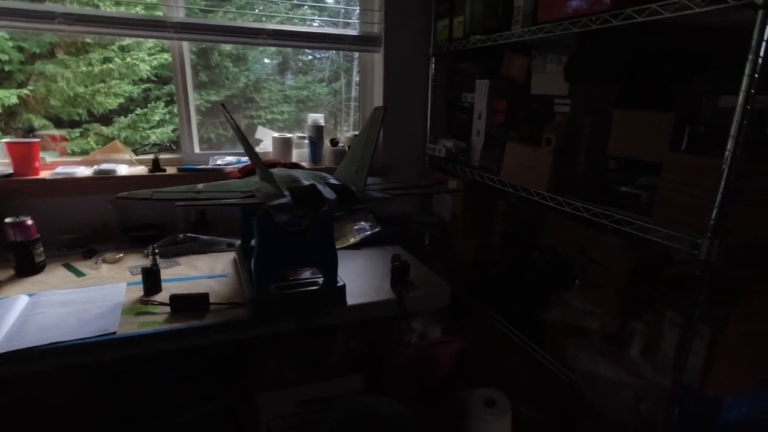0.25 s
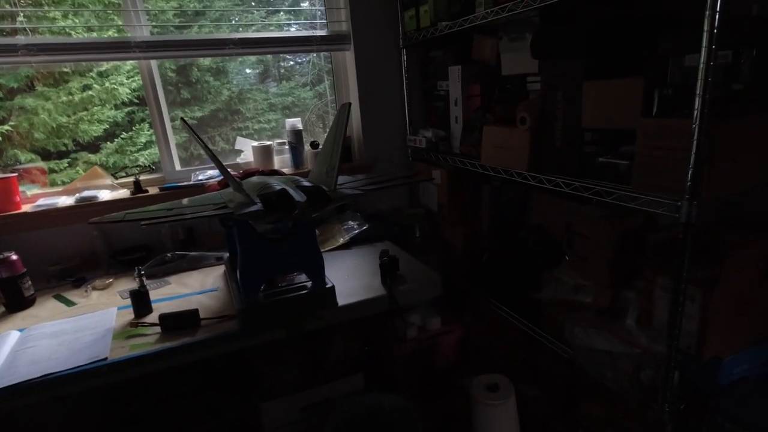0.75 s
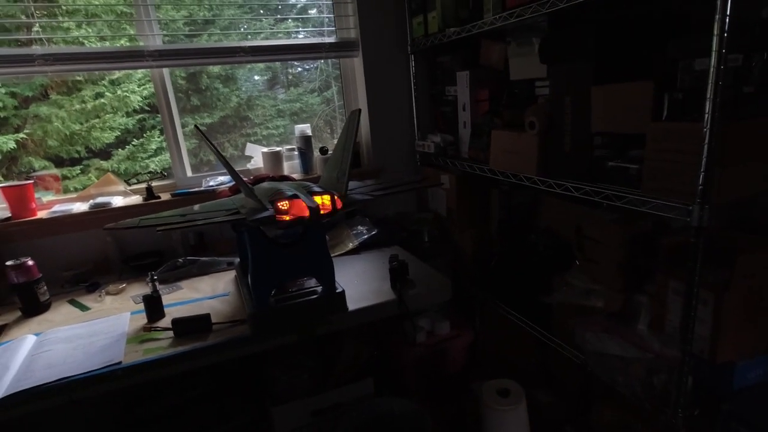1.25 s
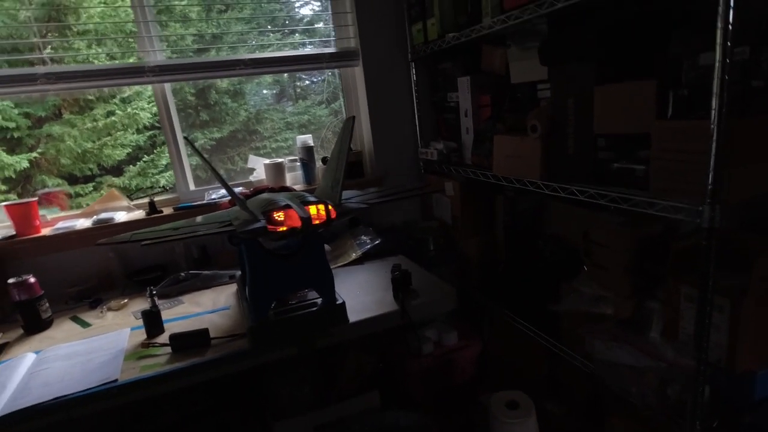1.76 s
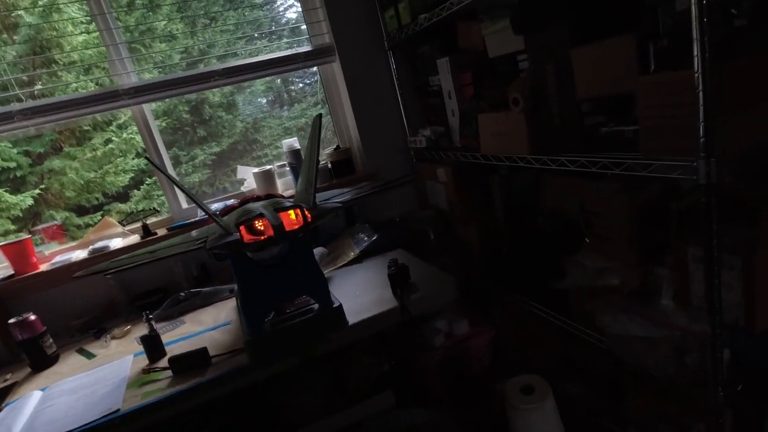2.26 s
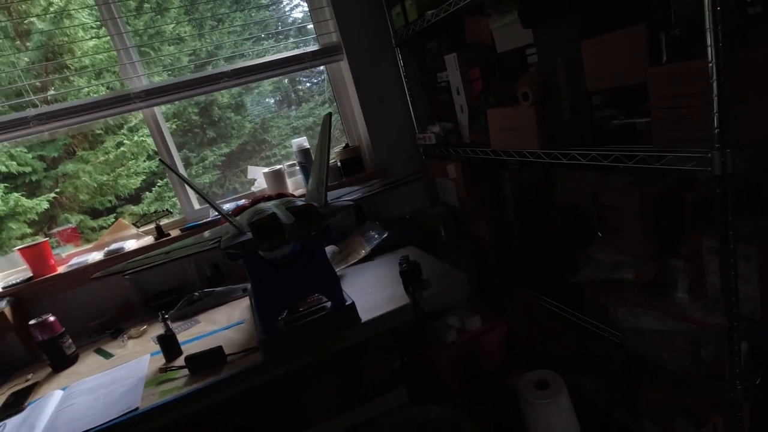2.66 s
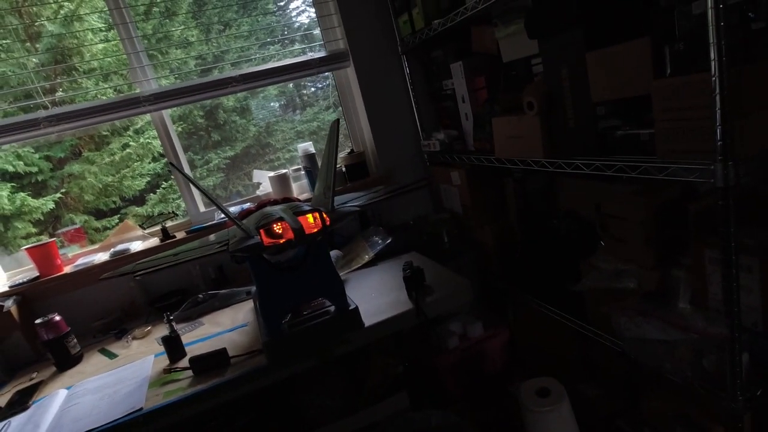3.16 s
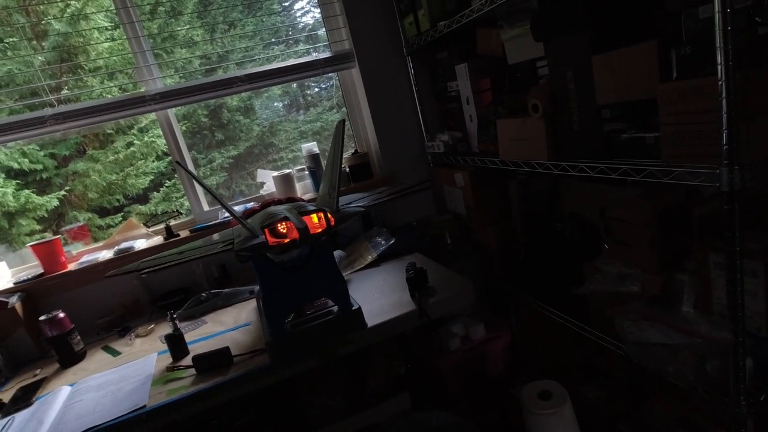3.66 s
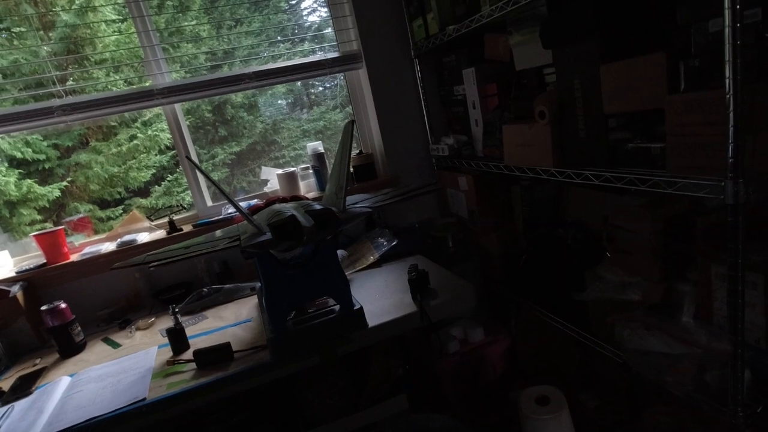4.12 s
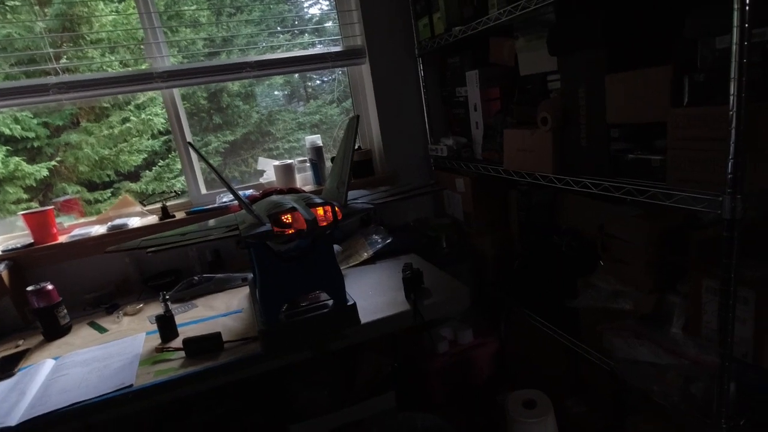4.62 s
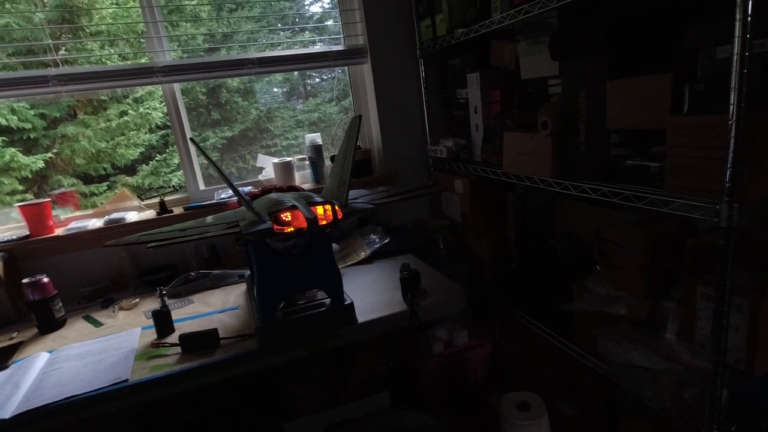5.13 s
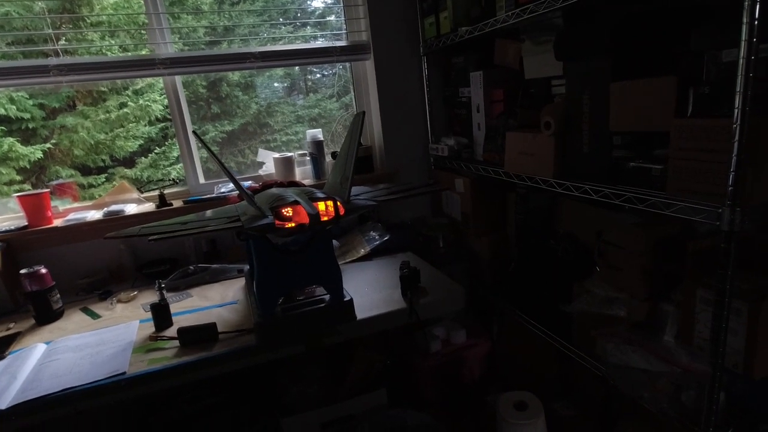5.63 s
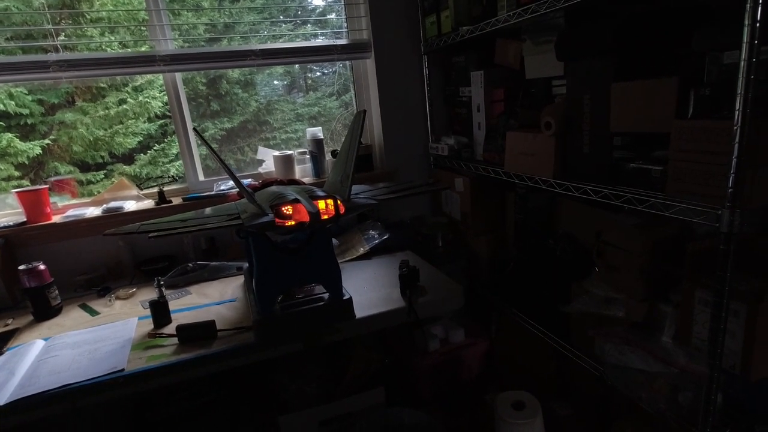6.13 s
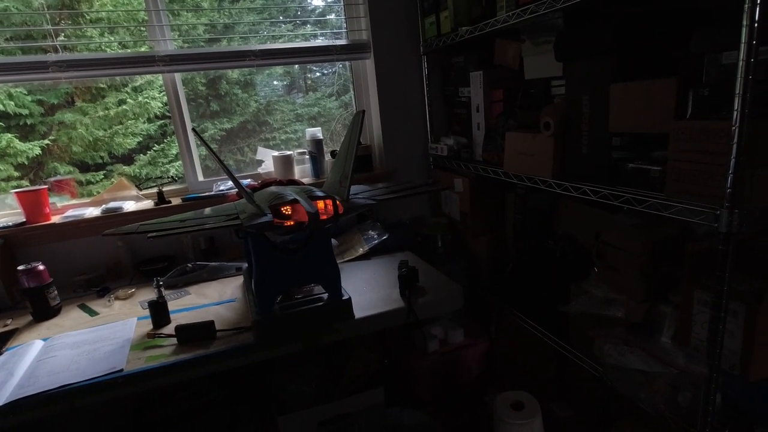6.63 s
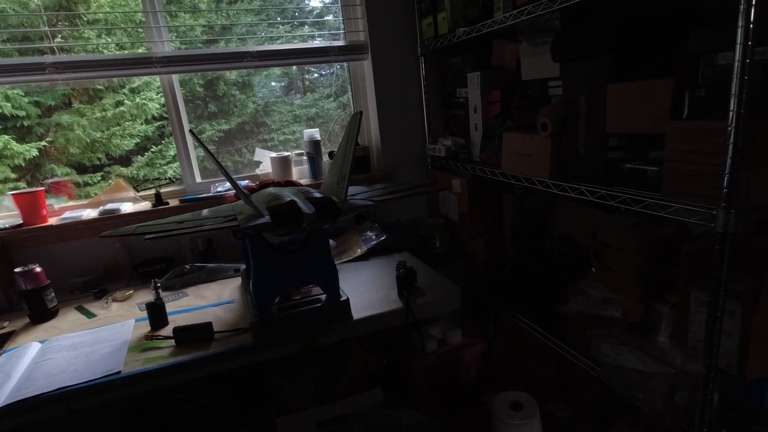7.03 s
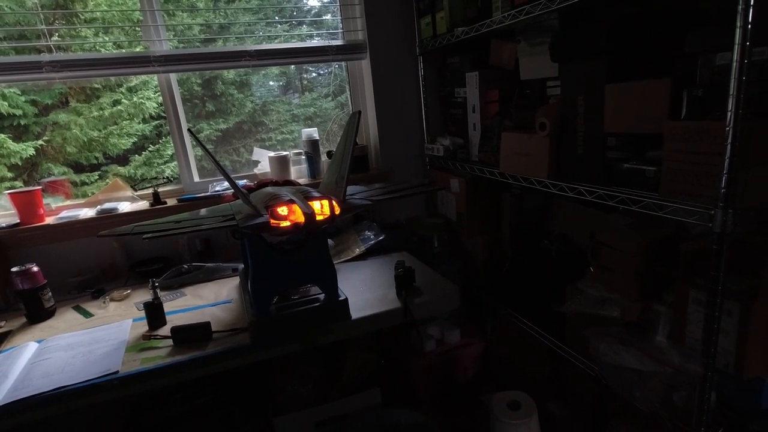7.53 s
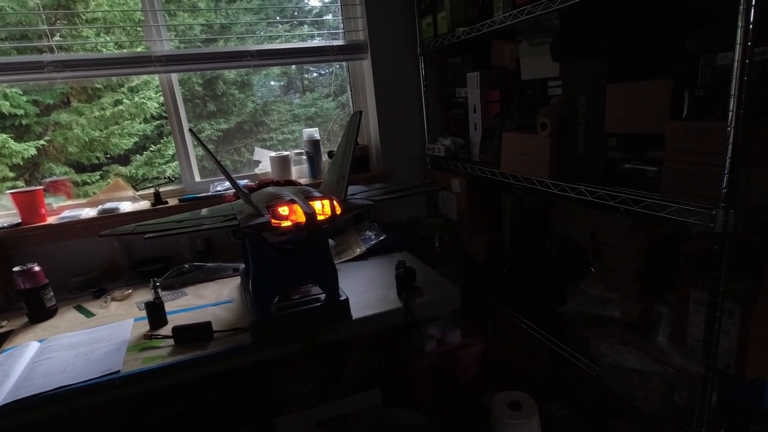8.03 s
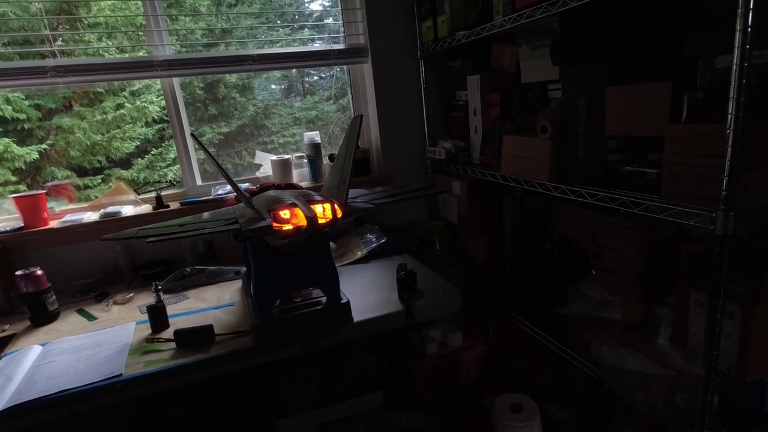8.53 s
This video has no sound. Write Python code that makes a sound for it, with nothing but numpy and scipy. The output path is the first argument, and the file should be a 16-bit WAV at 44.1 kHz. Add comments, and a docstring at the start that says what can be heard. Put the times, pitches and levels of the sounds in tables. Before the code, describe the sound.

Indoors, close behind a model jet's exhaust: quiet fan hiss and a piercing blade whine glide quickly upward, with a higher motor-coil squeal above. Fluttering puffs lick the microphone, growing into loud, low, uneven buffeting in both ears. Irregular hard gusts punch through with momentary ducking and rounded distortion. Fan roar and hiss grow brighter towards the end, still running at high speed.

```python
"""Model jet fan spooling up

A small electric ducted fan on a bench speeds up in steps, heard at two microphone ports in its exhaust.
Behind, the duct hums, roars and hisses (shaped noise), the blades whine and the motor coils sing (sine tones).
In front, the jet of air buffets the ports (noise played at a changing speed) and sharp gusts hit them
(short noise bursts). A limiter turns everything down for a moment under the strongest peaks."""
import sys
import numpy as np
from scipy import signal
from scipy.fft import rfft, irfft, next_fast_len
from scipy.io import wavfile
from scipy.ndimage import uniform_filter1d, minimum_filter1d, map_coordinates

SR = 44100
rng = np.random.default_rng(int(sys.argv[2]) if len(sys.argv) > 2 else 0)


def output_pcm(signal):
    """Save a mono or channel-first signal as 16-bit PCM at the path in sys.argv[1].

    Samples are clipped to [-1, 1] before scaling.
    """
    pcm = np.clip(np.atleast_2d(signal).T, -1, 1) * 32767
    wavfile.write(sys.argv[1], SR, np.round(pcm).astype(np.int16))


N = 387198

# All table levels are relative: the functions below add further gains.
# Air noise of the duct over time: (t/s, roar level/dB, hiss level/dB)
DUCT_LEVELS = [(0, -50, -54.5), (2.3, -51.5, -57.5), (3.2, -49.5, -55), (4.0, -49.5, -54.5),
               (4.9, -48, -52), (6.1, -46, -50), (7.5, -45, -47.5), (8.78, -45.5, -49.5)]
# Spectra of roar and hiss: (f/Hz, level per Hz/dB)
ROAR_SPECTRUM = [(300, -48), (900, -7), (1550, -3), (2300, 2.5), (3300, -1.5), (4300, -4.5), (5300, -8.5),
                 (7000, -32), (9000, -64)]
HISS_SPECTRUM = [(2650, -44), (4500, -30), (5370, -7.5), (6380, -4.5), (6970, -12.5), (7900, -8.5),
                 (8630, -12.5), (12800, 1.5), (14500, -0.5), (15600, -4)]
# Tail pipe resonances: (f/Hz, width/Hz, strength against the plain roar/dB)
PIPE_MODES = [(1590, 34, -9), (2300, 11, -20), (3150, 39, -7)]
# Hum of the airframe: (f/Hz, level per Hz/dB), then (t/s, level/dB)
HUM_SPECTRUM = [(100, -26), (250, -4.5), (500, -6), (1000, -5.5), (1300, -5.5), (1700, -15), (3000, -41)]
HUM_LEVELS = [(0, -44), (.5, -46.5), (1, -47), (2, -45.5), (8.78, -37.5)]
# Fuselage resonances: (f/Hz, width/Hz, strength against the plain hum/dB)
BODY_MODES = [(399.6, 20, 18.5), (589, 21, 12.5), (922, 49, 4)]
# Throaty whirr that dies away: (f/Hz, level per Hz/dB), then (t/s, level/dB)
WHIRR_SPECTRUM = [(1500, -40), (2200, -23), (2720, 1.5), (3100, -2.5), (3550, -3.5), (4200, -3),
                  (5500, -26)]
WHIRR_LEVELS = [(0, -43.5), (.33, -40), (.4, -52), (.5, -39), (.62, -47), (1, -48), (8.78, -82)]
# Throttle steps: (t/s, blade rate the rotor heads for, f/Hz)
THROTTLE_STEPS = [(0.0, 3430), (0.13, 3817), (0.311, 4050), (0.623, 4463), (2.235, 4755), (2.898, 4902),
                  (3.306, 5058), (3.836, 5208), (4.239, 5300), (4.407, 5428), (4.837, 5541), (5.079, 5603),
                  (5.408, 5741), (5.749, 5880), (6.28, 6104), (6.632, 6166), (6.922, 6252), (7.37, 6452),
                  (7.577, 6405)]
# Clear tones (blade, its octave, upper coil tone): (multiple of switching rate, multiple of blade rate)
CLEAR_TONES = [(0, 1), (0, 2), (1, 1)]
# How loud each clear tone is at each pitch, one list per tone: (f/Hz, level/dB)
TONE_PATHS = [
    [(3430, -48), (3700, -34.5), (3880, -45), (4000, -40.5), (4150, -43), (4460, -47.5), (5400, -47),
     (6420, -50)],
    [(6860, -68), (9000, -65), (9700, -65), (10100, -58.5), (11400, -52), (12850, -45)],
    [(11450, -56), (12000, -61), (12480, -46.5), (12800, -38.5), (13100, -54), (13500, -62), (14450, -64)],
]
# Brief swells and fades, one list per clear tone: (t/s, half length/s, level change/dB)
TONE_SWELLS = [
    [(.63, 0.021, 5.5), (.93, 0.046, -3), (1.05, .057, 1.5), (1.67, 0.069, 10), (1.88, 0.048, 6),
     (2.13, 0.1, -20), (2.95, .03, 10), (3.04, 0.036, -2), (3.31, 0.11, -10), (3.45, 0.029, 6),
     (3.95, .05, -7), (4.1, 0.041, 2), (4.36, 0.047, 0), (4.53, 0.031, 1), (4.64, .038, -6),
     (4.81, .055, -6), (4.93, 0.037, 3), (5.34, 0.05, 6), (5.47, 0.034, -13), (6.27, 0.19, 8.5),
     (6.37, 0.058, -6), (7.69, 0.2, 5.5), (8.52, 0.26, -19)],
    [(3.39, 0.042, -8), (3.53, .034, -7), (3.65, 0.052, 9), (4.32, 0.041, 10), (4.5, .05, -4),
     (5.39, 0.13, 4), (6.55, 0.059, 6), (7.07, 0.05, 11), (7.11, 0.33, -7), (8.17, 0.12, -4)],
    [(1.0, 0.061, 2), (1.3, 0.1, -10), (1.78, 0.041, -1.5), (2.46, 0.093, 5), (2.87, .03, -14),
     (2.97, 0.039, 6.5), (3.15, 0.33, 2.5), (3.85, .098, -11), (3.93, 0.13, 15), (4.36, 0.055, 9),
     (4.69, 0.072, -14)],
]
# Passing faint tones: (multiple of switching rate, multiple of blade rate, start t/s, end t/s, level/dB)
FAINT_TONES = [(0, 3, 0, .14, -60), (0, 3, 2.3, 3.3, -64), (0, 3, 3.45, 4.1, -59), (0, 2.5, 3.55, 4.1, -50),
               (1, .5, 1.5, 2.3, -64), (1, .5, 2.35, 2.95, -56), (2, -.5, 6, 6.35, -49),
               (1, 0, .1, 2.1, -69)]
# Brief dips of all the fan noise and tones: (t/s, depth/dB)
FAN_DIPS = [(2.35, 3), (3.08, -1), (3.26, 2), (3.81, 0), (3.94, 3), (4.25, 2), (4.43, 3), (4.64, 0),
            (5.06, 2), (5.65, 3), (5.99, 3.5), (6.37, 5), (6.77, 3), (7.14, 5), (7.36, 2), (7.53, 1),
            (7.73, 6), (7.85, 3.5), (8.21, 3), (8.44, 3)]
# Steady part of the exhaust stream on the ports: (t/s, level/dB, sharpness/dB)
STREAM_LEVELS = [(0, -70, -14), (.23, -61, -14), (.26, -33.5, -13), (.47, -31.5, -15), (.54, -53, -14),
                 (.65, -41, -16), (1.3, -29.5, -15), (1.37, -52, -14), (1.5, -42, -15), (1.68, -38, -15),
                 (1.76, -16, -16), (1.9, -16.5, -13), (2.15, -16.5, -18), (2.75, -11.5, -17.5),
                 (3.2, -13.5, -16), (3.75, -14.5, -12.5), (4.25, -14.5, -13), (4.7, -14.5, -14),
                 (5.2, -16.5, -14.5), (5.7, -14.5, -16), (6.2, -15, -16), (6.8, -13.5, -13.5),
                 (7.35, -15, -15), (7.6, -15, -16), (8.0, -15, -15.5), (8.4, -16.5, -15), (8.78, -18, -15)]
# Early moments when the stream licks the ports: (start t/s, length/s, level/dB, sharpness/dB)
STREAM_SURGES = [(0.348, 0.061, -22, -14), (0.595, 0.059, -19.5, -29), (0.686, 0.062, -23, -27),
                 (0.75, 0.077, -24.5, -16), (0.858, 0.059, -12, -22), (0.936, 0.065, -24, -11),
                 (1.037, 0.044, -22.5, -31), (1.139, 0.042, -23.5, -17), (1.183, 0.051, -21.5, -22),
                 (1.24, 0.08, -22.5, -14), (1.396, 0.079, -23, -11), (1.505, 0.043, -27, -18),
                 (1.552, 0.089, -22.5, -10), (1.641, 0.031, -25, -9), (1.687, 0.069, -16.5, -20)]
# Moments when the stream swings away: (t/s, depth/dB)
STREAM_LULLS = [(2.05, 5.5), (2.59, 15.5), (3.59, 10), (4.67, 6), (4.84, 9), (5.36, 8), (5.571, 11),
                (5.82, 0), (5.93, 9), (6.04, 4), (6.21, 9), (6.43, 4.5), (6.63, 10), (7.48, 4), (7.70, 8),
                (7.80, 12), (8.46, 10), (8.66, 1)]
# Eddies at middle speed, and slow pressure heaves: (f/Hz, level per Hz/dB)
EDDY_SPECTRUM = [(12, -0.5), (22, -10.5), (45, -1), (150, -1), (300, -9.5), (600, -20), (1200, -31.5),
                 (2500, -49.5), (6000, -80)]
HEAVE_SPECTRUM = [(12, -23), (22, -2), (45, -11), (90, -7), (160, -32), (400, -90)]
# Single sharp gusts: (t/s, peak level/dB, edge against peak/dB, left over right/dB)
GUST_HITS = [(0.955, -10, -47, -1), (1.417, -10.5, -24, -1.5), (1.569, -21, -38, 13), (2.153, -14, -35, 9),
             (2.288, -16, -12.5, -2), (2.618, -16, -29, -5), (2.881, -20, -32, 1), (2.941, -11, -10, 3),
             (3.002, -5, -15, -1), (3.133, -16, -13, 2), (3.383, -3, -22, -3), (3.814, 8.5, -11.5, 1.5),
             (3.937, -14, -19, -3), (4.019, -4, -9.5, -3), (4.134, -14, -11, 6), (4.166, -3, -18, -4),
             (4.287, -18, -2, 4), (4.31, -3.5, -21, 0), (4.364, -12, -21, -8), (4.422, -5, -22, 0),
             (4.486, -12, -24, 0.5), (4.629, -1.5, -14, 1), (4.708, -11, -27, -7), (4.882, -14, -30.5, 6),
             (5.009, -6, -14, 2.5), (5.176, -8, -11.5, -2), (5.256, -8, -14.5, 1), (5.513, -8.5, -8.5, 2),
             (5.563, -6.5, -11.5, 3.5), (5.645, -7.5, -6, -1), (5.768, -1.5, -19, -2.5),
             (5.886, -11.5, -30, -7), (6.137, -14, -34, -2), (6.35, -13.5, -6, -3), (6.488, -4.5, -22, 1),
             (6.594, -4, -7.5, -6), (6.638, -6.5, -31, 4), (6.891, -2, -6.5, 3), (7.281, -3.5, -10, -1),
             (7.441, -17, -27, 18), (7.723, -10, -14, -1), (7.882, -3.5, -9, 0), (8.174, -6.5, -12.5, 2),
             (8.251, -17, -12, -1), (8.317, -16, 3, 1), (8.438, -10, -11.5, -2), (8.673, -10.5, -8, 2)]
# Body and ragged edge of a gust: (f/Hz, level per Hz/dB)
PUFF_SPECTRUM = [(60, 18.5), (200, -2.5), (500, 1), (1000, -11), (1600, -40), (3000, -136), (6000, -90)]
EDGE_SPECTRUM = [(600, 8), (1300, 8), (1800, 1.5), (2600, -8), (4000, -17), (7000, -35)]

SWITCH_HZ, ROTOR_LAG_S = 8021, .0674  # motor drive switching rate; rotor response time
TONE_FADE_DB, DIP_S = 2, 0.018
LULL_S, SWAY_DB, SHARP_SWAY_DB = 0.016, 0.63, 1.7845
QUICKEN_DB, QUICKEN_S = 4, .025  # each gust also sharpens the stream around it
TOP_HZ = 15784  # nothing passes above this
STEP = 64  # slow curves are worked out on every 64th sample
COARSE = np.arange(0, N + STEP, STEP)


def amp(db):
    """Turn dB into an amplitude factor."""
    return 10 ** (np.asarray(db) / 20)


def unit(x):
    """Scale to an rms of 1."""
    return x / np.sqrt(np.mean(x ** 2) + 1e-20)


def curves(rows):
    """One value per sample for each column after the time."""
    s, *columns = np.transpose(rows)
    return [np.interp(np.arange(N) / SR, s, column) for column in columns]


def fine(x):
    """Go from every 64th sample to all of them."""
    return np.interp(np.arange(N), STEP * np.arange(len(x)), x)


def bumps(centres, widths):
    """One smooth bell in time for each centre, on the coarse grid."""
    return np.exp(-((COARSE / SR - np.c_[centres]) / np.c_[widths]) ** 2)


def wobble(knots_per_s):
    """A smooth random curve through random knots."""
    knots = rng.standard_normal(N // 300)
    return fine(map_coordinates(knots, [COARSE * knots_per_s / SR]))


def filtered(x, response):
    """Shape x by a gain that depends on frequency."""
    n = x.shape[-1]
    m = next_fast_len(n + 8192)
    return irfft(rfft(x, m) * response(np.fft.rfftfreq(m, 1 / SR)), m)[..., :n]


def noise(spectrum, alike, patchy_db, size=N):
    """Two noises of one spectrum and joint rms 1, alike by 0-1, in small patches of random gain."""
    f, db = np.transpose(spectrum)
    z = signal.stft(rng.standard_normal((2, size)), nperseg=1024)[2]
    patches = rng.standard_normal(z.shape[1:])
    for axis in (0, 1):
        patches = uniform_filter1d(patches, size=3, axis=axis)
    pair = signal.istft(z * amp(patchy_db * unit(patches)), nperseg=1024)[1][:, :size]
    a, b = filtered(pair, lambda hz: amp(np.interp(np.log(hz + 1), np.log(f), db)))
    turn = np.arccos(np.clip(alike, 0, 1)) / 2  # mixing angle that sets how alike they are
    common, differing = np.cos(turn) * a, np.sin(turn) * b
    return unit(np.array([common + differing, common - differing]))


def ringing(modes):
    """Response of the plain sound plus resonances, each a mass on a spring with friction."""
    def response(f):
        total = 1
        for centre, width, db in modes:
            friction = 1j * f * width
            total = total + amp(db) * friction / (centre ** 2 - f ** 2 + friction)
        return total
    return response


def duct():
    """Air noise of the fan: hum ringing in the fuselage, whirr, roar in the pipe, hiss of tips and nozzle."""
    roar_db, hiss_db = curves(DUCT_LEVELS)
    hum = filtered(noise(HUM_SPECTRUM, alike=0.99, patchy_db=3.5), ringing(BODY_MODES))
    hum = amp(curves(HUM_LEVELS)[0]) * hum
    whirr = amp(curves(WHIRR_LEVELS)[0]) * noise(WHIRR_SPECTRUM, alike=0.4, patchy_db=4.5)
    shiver_db = 0.6 * wobble(40) + 0.94 * wobble(12)  # shared by roar and hiss
    roar = filtered(noise(ROAR_SPECTRUM, alike=0.26, patchy_db=1.5), ringing(PIPE_MODES))
    roar = amp(roar_db + 6.5 + shiver_db) * roar
    hiss = amp(hiss_db + 9.0 + shiver_db) * noise(HISS_SPECTRUM, alike=0.05, patchy_db=2.4)
    return hum + whirr + roar + hiss


def rotor():
    """Blade rate in Hz: the rotor's inertia makes it glide to each throttle step without overshoot."""
    s, hz = np.transpose(THROTTLE_STEPS)
    lags = np.maximum(COARSE / SR - s[1:, None], 0) / ROTOR_LAG_S  # time since each step, in lags
    return fine(hz[0] + np.diff(hz) @ (1 - (1 + lags) * np.exp(-lags)))


def whine(flutter_db=2.2, offset=.72, drift=.15, smear=.27):
    """Blade and coil tones: their loudness flutters quickly at random;
    their phase (radians) differs between left and right and drifts slowly, with a quicker random blur."""
    blade_hz, t = rotor(), np.arange(N) / SR
    blade_phase = 2 * np.pi * np.cumsum(blade_hz) / SR
    switch_phase = 2 * np.pi * SWITCH_HZ * t
    tones = []
    for (m, k), path, rows in zip(CLEAR_TONES, TONE_PATHS, TONE_SWELLS):
        path_db = np.interp(m * SWITCH_HZ + k * blade_hz, *np.transpose(path))
        s, half, change_db = np.transpose(rows)
        swell_db = fine(change_db @ bumps(s, half))
        tones.append((m * switch_phase + k * blade_phase, path_db + swell_db + TONE_FADE_DB * wobble(18)))
    for m, k, start, end, db in FAINT_TONES:
        # quick fade in and out, rising slightly between
        fade_db = np.interp(t, [start - .08, start, end, end + .08], [-40, 1, 3.0, -40])
        tones.append((m * switch_phase + k * blade_phase, db + fade_db))
    out = np.zeros((2, N))
    blur = smear * np.array([wobble(40), wobble(40)])
    for phase, db in tones:
        apart = (offset + drift * wobble(3)) * np.array([[1], [-1]])
        loudness = np.sqrt(2) * amp(db + flutter_db * wobble(60))
        out += loudness * np.sin(phase + apart + blur)
    return out


def blast(calm=.05):
    """Level and sharpness of the exhaust on the ports: a swaying stream, early surges, later lulls."""
    start, length, surge_db, surge_sharp_db = np.transpose(STREAM_SURGES)
    surge = bumps(start + length / 2, length / 2)
    s, depth_db = np.transpose(STREAM_LULLS)
    stream_db, stream_sharp_db = curves(STREAM_LEVELS)
    stream_db = stream_db + SWAY_DB * wobble(14) - fine(depth_db @ bumps(s, LULL_S))
    level_db = 10 * np.log10(amp(2 * stream_db) + fine(amp(2 * surge_db) @ surge ** 2))  # powers add
    # sharpness is an average; calm is the weight of the steady stream
    sharp_db = fine(surge_sharp_db @ surge) + calm * stream_sharp_db
    sharp_db = sharp_db / (fine(surge.sum(0)) + calm + 1e-9)
    quicken_db = QUICKEN_DB * fine(bumps(np.transpose(GUST_HITS)[0], QUICKEN_S).sum(0))
    return level_db, sharp_db + quicken_db + SHARP_SWAY_DB * wobble(22)


def buffeting(neutral_db=-14, octaves_per_db=0.08, shared=.12, own=.26, quick=.15, power=2.05):
    """Frozen eddies sweep past each port: faster air raises their pitch, and its flutter their loudness."""
    level_db, sharp_db = blast()
    eddies = noise(EDDY_SPECTRUM, alike=0, patchy_db=2.5, size=2 * N)
    apart = np.array([own * wobble(55) + quick * wobble(130) for port in range(2)])
    flutter = .6 * np.tanh((shared * wobble(30) + apart) / .6)  # octaves of speed, the swings bounded
    speed = 2 ** np.clip(octaves_per_db * (sharp_db - neutral_db) + flutter, -2, 1.5)
    place = np.cumsum(speed, axis=1)  # reading position in the frozen noise
    swept = np.array([map_coordinates(e, [p], order=1, mode="mirror") for e, p in zip(eddies, place)])
    stream = amp(level_db + 4.0) * unit(swept * 2 ** (power * flutter))
    heave_gain = np.hypot(amp(uniform_filter1d(level_db, size=SR // 8) - 11), amp(-44.5))  # never quite still
    return stream + heave_gain * noise(HEAVE_SPECTRUM, alike=0.067, patchy_db=2.5)


def evened(x):
    """Level the noise over 10 ms so that every gust arrives near its set strength."""
    return x / np.sqrt(np.abs(uniform_filter1d(x ** 2, size=SR // 100)) + 0.051)


def gusts(lag=0.005, core=0.0019, skirt=0.015):
    """Fast knots of air: puffs with a ragged edge, a sharp core inside a softer swell (times in s)."""
    half = SR // 20
    t = np.arange(-half, half) / SR - lag
    shape = np.exp(-(t / core) ** 2) + 0.39 * np.exp(-(t / skirt) ** 2)
    puff, edge = np.zeros((2, N + SR)), np.zeros((2, N + SR))
    for s, db, edge_db, pan_db in GUST_HITS:
        sides = amp([[db + pan_db / 2], [db - pan_db / 2]]) * shape
        begin = round(s * SR) - half
        puff[:, begin:begin + len(t)] += sides * amp(2.5)
        edge[:, begin:begin + len(t)] += sides * amp(edge_db + 0.5)
    body = puff[:, :N] * evened(noise(PUFF_SPECTRUM, alike=0.14, patchy_db=3.5))
    ragged = edge[:, :N] * evened(noise(EDGE_SPECTRUM, alike=0.2, patchy_db=6.5))
    return body + ragged


def scene():
    """Duct noise and tones, dipping together, behind wind that leans slightly to the right."""
    s, depth_db = np.transpose(FAN_DIPS)
    dip = amp(-fine(depth_db @ bumps(s, DIP_S)))
    fan = dip * (duct() + amp(-1.2) * whine())
    wind = amp([[-.35], [.35]]) * (buffeting() + gusts())
    return wind + fan


def record(dry):
    """Ports leak into each other, a limiter ducks both under peaks, big low swings round off; top cut."""
    leak, ceiling = .07, 1.3
    mixed = dry + leak * dry[::-1]
    need = np.minimum(1, ceiling / (np.abs(mixed).max(0) + 1e-9))
    gain = uniform_filter1d(minimum_filter1d(need, size=601), size=301)  # window sizes in samples
    bass = filtered(mixed, lambda hz: 1 / (1 + (hz / 2500) ** 4))
    ducked = bass * gain
    rounded = ducked / (1 + np.abs(ducked / .96) ** 4) ** .25  # soft saturation
    return filtered(rounded + (mixed - bass) * gain, lambda hz: hz < TOP_HZ)


dry = scene()
out = record(dry)
output_pcm(out)
```